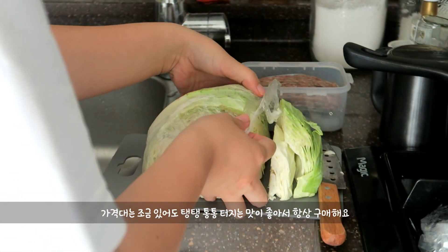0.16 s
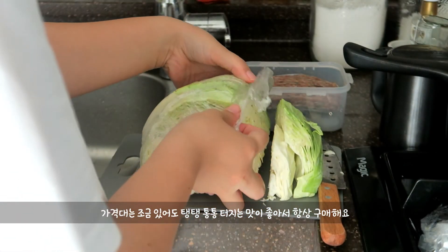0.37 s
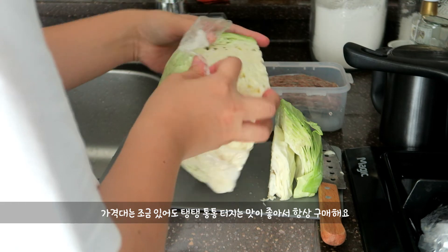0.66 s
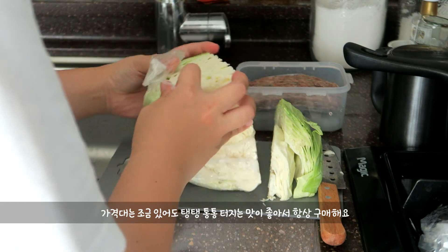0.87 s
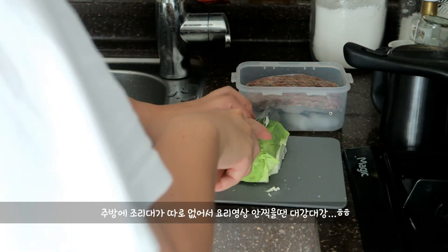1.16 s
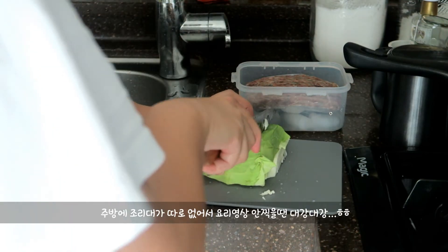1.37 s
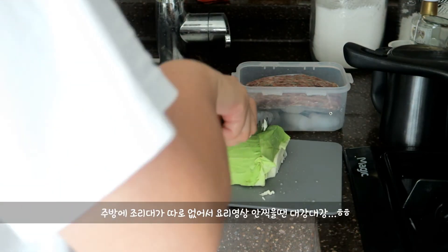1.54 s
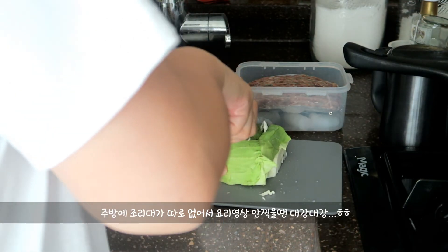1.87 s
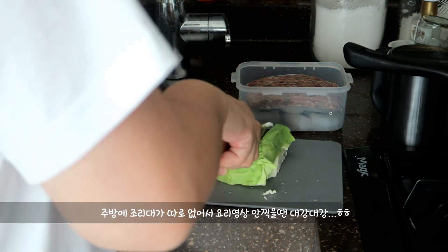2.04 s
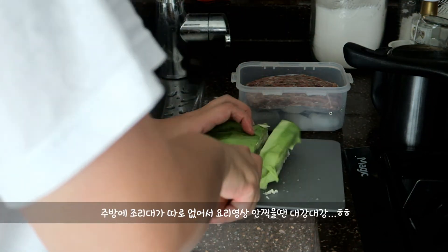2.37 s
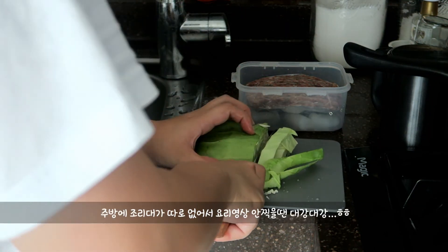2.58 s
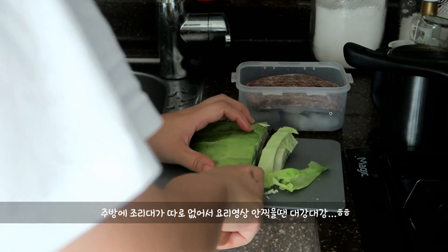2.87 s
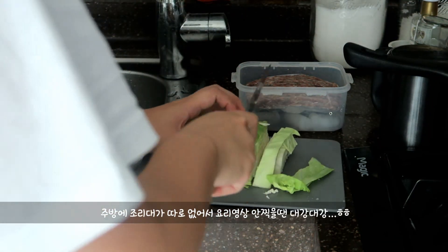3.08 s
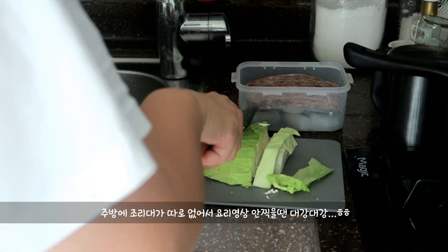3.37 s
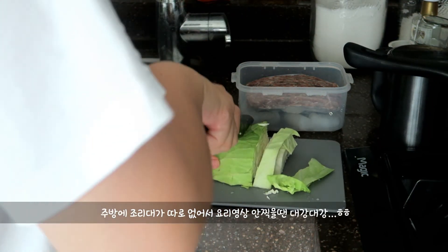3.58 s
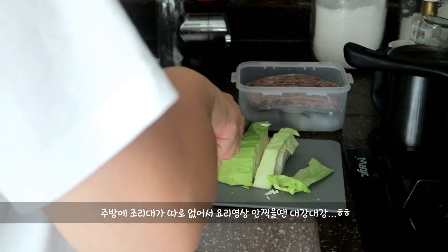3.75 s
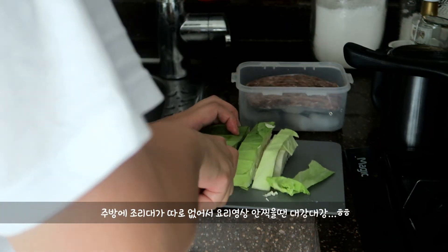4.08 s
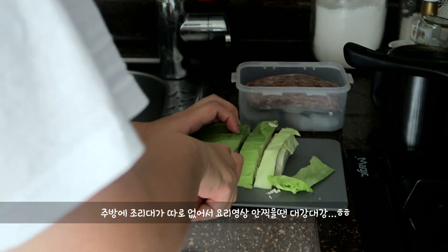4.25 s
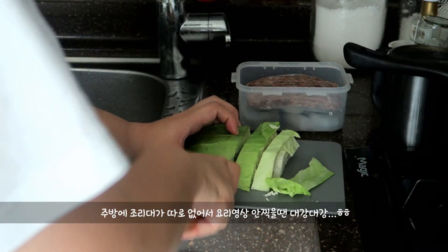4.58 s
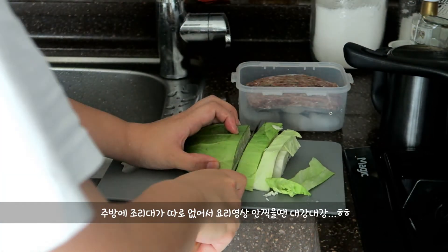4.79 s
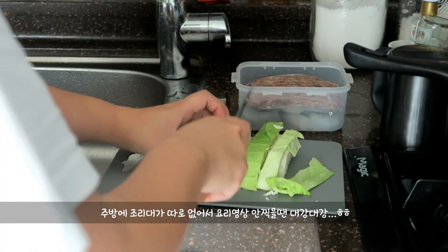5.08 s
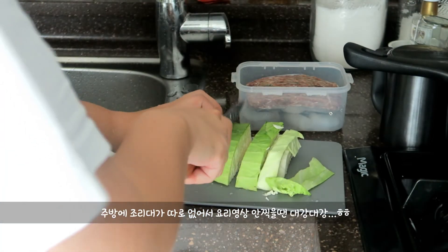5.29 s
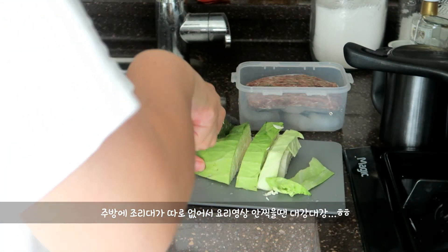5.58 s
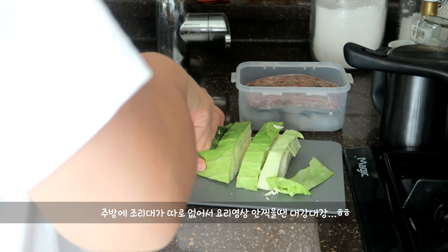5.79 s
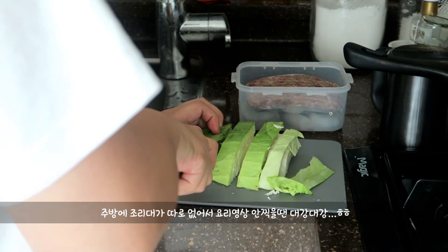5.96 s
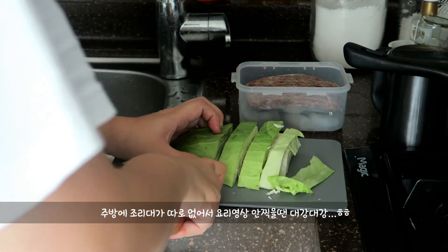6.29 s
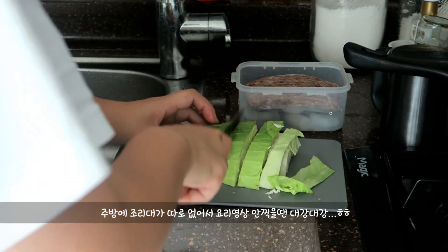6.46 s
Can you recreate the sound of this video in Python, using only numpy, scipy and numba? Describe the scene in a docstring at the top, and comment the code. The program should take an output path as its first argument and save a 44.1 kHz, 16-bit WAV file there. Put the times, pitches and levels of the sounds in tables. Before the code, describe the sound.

Close stereo pickup in a small tiled kitchen with a faint fridge hum. Cling film crinkles briefly, then a cabbage head lands with a deep, rocking thud. A knife presses through a wedge in three slow cuts, leaves crunching and snapping in uneven bursts, each ending in a sharp knock on a plastic board. The last cut knocks twice, with a short hollow ring.

```python
"""A fridge hums in a small tiled kitchen while cling film crinkles and rustles in swarms of tiny rings.
A cabbage is set down: worktop modes boom and filtered noise slaps. Then a knife is pushed through
a wedge three times: leaves crunch in bursts of dense short rings, the worktop shakes with low noise
and the blade knocks on a plastic board, heard as short modes and a crack of noise.
The level dips, most in the treble, after the loudest blows; a hollow ring follows the last knock."""
import sys
import numpy as np
from scipy import signal
from scipy.fft import rfft, irfft, next_fast_len
from scipy.io import wavfile
from scipy.ndimage import uniform_filter1d
from numba import njit

SR = 44100
rng = np.random.default_rng(int(sys.argv[2]) if len(sys.argv) > 2 else 0)


def decibels_to_gain(level_db):
    """Convert a level in decibels to a linear amplitude gain (20 dB per decade)."""
    exponent = np.asarray(level_db, float) / 20
    return 10 ** exponent


def file_out(sig):
    """Save sig as 16-bit WAV at sys.argv[1]."""
    # one column per channel
    cols = np.atleast_2d(sig).T
    # limit, then scale
    lim = np.clip(cols, -1, 1)
    pcm = np.round(lim * 32767).astype(np.int16)
    wavfile.write(sys.argv[1], SR, pcm)


N = 292383
TIME = np.arange(N) / SR
TICK = np.arange(0, N / SR + .002, .001)  # seconds, the coarse clock of the level curves

# Levels in these tables are relative within their layer unless said otherwise.
# Fridge hum partials: pitch_hz, level_db
HUM_PARTIALS = [(59.2, -60.5), (118.4, -65.5), (177.6, -65), (290, -64)]
# Spectral shape of the kitchen air: pitch_hz, level_db (per Hz)
AIR_SPECTRUM = [(15, -28.5), (25, -3.5), (59, -6), (109, -5.5), (231, 0.5), (298, 4), (451, -3.5),
                (797, -4), (979, -7.5), (1060, -12.5), (2180, -21), (3560, -25.5), (12000, -72),
                (15600, -97), (22000, -120)]
# Stereo width of air and reflections: pitch_hz, side_minus_mid_db
SIDE_WIDTH = [(60, -36.5), (110, -26.5), (200, -9.5), (380, -5), (700, -5), (1290, -1.5), (2380, 4),
              (4400, 4), (8120, 1), (15000, 7.5)]
# Reverberation bands: centre_hz, t60_s, level_db
ROOM_BANDS = [(90, .22, -8), (250, .33, -5), (600, .37, -3), (1400, .32, -5), (3200, .29, -7),
              (7000, .23, -7), (13000, .15, -9)]
# Phase between the microphone ports: pitch_hz, left_lead_rad
PORT_LEAD = [(0, 0), (1400, -1.1), (2800, -1.45), (5600, -1.75), (11000, -2.1), (16000, -2.2)]
# Dips of the whole level: start_s, middle_band_depth_db, sink_s, hold_s, return_time_constant_s
LEVEL_DIPS = [(.922, -22, .025, .093, .008), (2.58, -22, .12, .09, .16), (4.62, -8, .18, .012, .08),
              (6.36, -28, .15, .04, .14)]
# Film crinkles: start_s, level_db, centre_hz, spread_s
FILM_CRINKLES = [(.004, -40, 3000, 0.024), (0.125, -33.5, 3500, 0.005), (0.16, -34, 4040, 0.0066),
                 (.2, -28.5, 2992, 0.006), (0.216, -43, 2537, 0.011), (0.266, -47.5, 3038, 0.016),
                 (0.326, -40.5, 5050, 0.0067), (0.4, -40, 3387, 0.005), (0.482, -45, 3524, 0.0025),
                 (0.555, -41, 3900, 0.012), (0.592, -38, 3800, 0.0098), (0.66, -47.5, 4570, 0.006),
                 (0.779, -46.5, 3560, 0.0047), (0.796, -42, 2900, 0.005), (0.814, -43, 6070, .005)]
# Cabbage head landing and rocking: start_s, level_db, slap_db (relative to level_db)
CABBAGE_THUDS = [(.866, -18, -10), (.8765, -9, -15), (.893, -12, -24), (.909, -22, -6)]
# Ringing modes of the worktop: pitch_hz, level_db, t60_s
WORKTOP_MODES = [(57.2, -1.5, 0.09), (102.2, 6.5, 0.029), (154.6, -5, 0.043), (285, -12.5, 0.029),
                 (464, -19.5, 0.033), (854, -21, 0.037)]
# Blade meets board, with its bounces: start_s, level_db, crack_db (relative to level_db),
# crack_corner_hz, crack_t60_s
BLADE_KNOCKS = [(2.3978, 4, 11, 2000, 0.02), (2.4025, -5.5, 12, 1800, 0.034), (4.5323, 1, 4, 2300, 0.01),
                (4.538, -10, 16, 1500, 0.022), (5.9478, 0.5, 13, 3200, 0.012),
                (5.9525, -8, 16, 2630, 0.018), (6.1839, -1.5, 15, 2282, 0.012),
                (6.189, -5.5, 14, 1700, 0.028)]
# Ringing modes of the plastic board: pitch_hz, level_db, t60_s
BOARD_MODES = [(395, -6, .04), (505, -6, .04), (630, -5, .035), (720, -3, .035), (810, -4, .035),
               (1030, -3, .025), (1250, -2, .025), (1380, -2, .02), (1900, -1, .015), (2160, 0, .015),
               (2780, -3, .012), (3500, -6, .01)]
# Small snaps of single ribs: start_s, level_db, centre_hz, ring_cycles (to fall 60 dB)
RIB_SNAPS = [(1.593, -36.5, 3160, 4.3), (1.638, -45.5, 2050, 3.2), (1.757, -26, 4590, 5.4),
             (1.913, -16, 4870, 5.0), (2.021, -16, 360, 6.4), (3.279, -52.5, 287, 5.0),
             (3.561, -28, 3960, 8), (3.641, -28.5, 1104, 6.3), (3.92, -33, 293, 3.5),
             (4.218, -26.5, 2338, 7.7), (4.394, -18.5, 262, 6.6), (5.009, -28.5, 260, 6.8),
             (5.644, -11.5, 1900, 5.0), (5.886, -21, 2010, 5.0)]
# A wet leaf squeaks: start_s, end_s (full level between them), pitch_hz, rms_level_db
LEAF_SQUEAK = (5.105, 5.165, 1500, -57)
# Spectral shape of the crisp crackle: pitch_hz, level_db (per Hz)
CRISP_SPECTRUM = [(710, -31), (1200, -6.5), (1340, -15), (1420, -10), (1880, -5), (2050, -5), (4930, -9.5),
                  (11400, -20.5), (14400, -35), (15500, -31)]
# Spectral shape of the hollow ring: pitch_hz, level_db (per Hz)
HOLLOW_SPECTRUM = [(120, -36.5), (200, -24), (395, 1.5), (540, -5), (620, -6), (766, -5), (1130, -6),
                   (1430, -12), (1800, -16.5), (2340, -37), (3960, -120)]
# Spectral shape of the worktop shake: pitch_hz, level_db (per Hz)
SHAKE_SPECTRUM = [(25, -12), (45, 5.5), (70, -6.5), (115, 1.5), (160, 0.5), (220, -11.5), (400, -21.5),
                  (1000, -63.5)]
# Steady rustle, first under the film, later of hands or blade resting on the leaves:
# start_s, end_s, crisp_level_db, hollow_level_db, shake_level_db
STEADY_RUSTLES = [(0, .86, -70, -60, -59), (1.05, 1.56, -70, -57, -57), (1.58, 2.39, -57, -62, -52),
                  (2.93, 3.58, -76, -60, -60), (3.6, 4.5, -55, -62, -52), (4.72, 5.45, -90, -62, -56),
                  (5.47, 6.1, -55, -56, -56)]
# Bursts of rustle: first film and handling, later breaking leaf, at the end a hollow ring
# dying away after the last knock: peak_s, crisp_level_db, rise_s (by 20 dB), fall_s (by 20 dB),
# hollow_db (relative to crisp_level_db)
RUSTLE_BURSTS = [(0, -49, .01, .05, -4), (.128, -52, .008, .25, 1.5), (.202, -37, .014, .022, -7),
                 (.225, -54, .02, .22, 0), (.406, -45.5, .026, .017, -3), (.598, -51, .07, .02, -3),
                 (.802, -57, .05, .09, -11), (1.385, -69, .04, .2, 21), (1.43, -67, .1, .1, 22),
                 (1.546, -53, .06, .05, -9), (1.596, -42.5, .008, .05, -20), (1.642, -43, .008, .035, -8),
                 (1.762, -30, .016, .09, -4), (1.8, -34, .08, .07, -8), (1.885, -42, .1, .1, 1),
                 (1.922, -36, .02, .12, -4), (2.02, -30, .022, .1, -2), (2.045, -26, .05, .08, 3),
                 (2.1, -46, .05, .08, 14), (2.19, -45, .06, .06, -12), (2.27, -34, .05, .2, -9),
                 (2.31, -40, .05, .06, 9), (2.395, -20, .05, .005, 1.2), (2.965, -62, .06, .12, 11.5),
                 (3.038, -67, .05, .08, 12), (3.282, -50.5, .011, .03, -1), (3.46, -66, .08, .1, 5),
                 (3.51, -61, .04, .04, 1), (3.564, -44.5, .013, .03, -22), (3.61, -52, .04, .05, 8),
                 (3.652, -28, .016, .1, -6), (3.69, -25.5, .06, .06, -1.5), (3.81, -38, .1, .25, -1.5),
                 (3.9, -40, .05, .1, -2.5), (3.936, -27, .03, .08, -1.5), (3.962, -25, .035, .06, 13.5),
                 (4.04, -44, .05, .06, 14), (4.07, -35, .1, .08, -20), (4.12, -35, .08, .06, -20),
                 (4.234, -33, .045, .08, -25), (4.272, -28.5, .045, .05, 2.5), (4.415, -36, .05, .06, -2.5),
                 (4.526, -18.5, .018, .04, 2.5), (4.6, -45, .05, .06, 17), (4.65, -38, .1, .065, 4),
                 (4.73, -66, .05, .1, 20), (4.905, -59, .035, .2, -16), (4.976, -48, .08, .05, -4),
                 (5.16, -76, .06, .08, 26), (5.364, -52, .01, .03, 4), (5.475, -55, .025, .1, 1.5),
                 (5.505, -44, .05, .15, -12), (5.565, -41, .08, .08, -8), (5.65, -32, .009, .15, -2.5),
                 (5.69, -26, .07, .06, -.8), (5.725, -28, .05, .04, 5), (5.802, -32.5, .036, .08, -20),
                 (5.892, -26, .012, .03, -25), (5.945, -18, .06, .02, -8), (5.97, -33, .02, .035, 17),
                 (6.125, -41.5, .06, .2, -19), (6.184, -19, .014, .025, -8), (6.21, -38, .012, .04, 13),
                 (6.235, -56, .05, .07, 29), (6.42, -60, .15, .12, 9)]
# Weight shoved onto the worktop through knife or hand: peak_s, level_db, fall_s (by 20 dB)
WORKTOP_SHOVES = [(1.8, -41, .12), (1.94, -44, .08), (2.035, -30, .07), (2.1, -34, .1), (2.31, -39, .1),
                  (2.38, -34, .1), (3.3, -49, .13), (3.69, -39, .25), (3.82, -44, .1), (3.935, -28, .12),
                  (4.02, -37, .1), (4.09, -40, .15), (4.265, -31, .12), (4.42, -43, .12), (4.58, -46, .15),
                  (4.65, -43, .1), (4.715, -38, .1), (5.37, -41, .25), (5.66, -34, .15), (5.715, -29, .12),
                  (5.82, -39, .12), (5.93, -32, .12), (6.21, -42, .08)]
# Brightness of the crackle before loudness alters it: time_s, tilt_db_per_octave
CRISP_TILT = [(0, -1), (.7, .6), (1.5, -2.5), (1.6, 6), (2.0, 5), (2.38, 3.5), (2.95, -4), (3.3, -.6),
              (3.58, -1.5), (3.66, 4), (3.86, -.8), (3.94, 2.5), (4.02, -.4), (4.13, 2.5), (4.22, -.8),
              (4.4, -.8), (4.53, 1.2), (4.6, -3), (4.75, -5), (4.93, 3), (5.08, -4), (5.46, -5),
              (5.56, 3.5), (5.66, 3.5), (5.75, .4), (5.9, -1.8), (6.15, 3.5), (6.19, -7)]
# Brightness of the hollow ring: time_s, tilt_db_per_octave
HOLLOW_TILT = [(0, -2.5), (1.5, -2.5), (1.9, 3), (2.1, -4), (2.32, -4), (2.4, 1.5), (3.0, -3), (3.5, .3),
               (3.65, 5), (3.8, 1.5), (3.94, 1.5), (4.0, -4), (4.35, -5), (4.5, 1.5), (5.6, .3), (5.72, 3),
               (5.97, -1.5), (6.2, 2.5), (6.4, 3)]


def on_log(hz, table):
    """A table of pitch and value read on a log pitch axis."""
    table_hz, value = np.transpose(table)
    return np.interp(np.log(np.maximum(hz, 1)), np.log(np.maximum(table_hz, 1)), value)


def shaped(x, gain):
    """x weighted by gain(hz)."""
    n = next_fast_len(x.shape[-1])
    hz = np.arange(n // 2 + 1) * SR / n
    return irfft(rfft(x, n) * gain(hz), n)[..., :x.shape[-1]]


@njit
def add(out, start, hz, t60, size):
    """Add decaying sines that swell in over their first cycle."""
    for k in range(len(start)):
        turn = np.exp(2j * np.pi * hz[k] / SR - np.log(1000) / (t60[k] * SR))
        z, onset, rise = size[k] + 0j, 1., np.exp(-2 * hz[k] / SR)
        for i in range(int(start[k] * SR), min(len(out), int((start[k] + t60[k]) * SR))):
            z *= turn
            onset *= rise
            out[i] += z.imag * (1 - onset)


def grains(start, hz, cycles, db):
    """Short rings, scaled so that energy follows db whatever the pitch."""
    out, t60 = np.zeros(N), cycles / hz
    add(out, start, hz, t60, decibels_to_gain(db) * np.sqrt(4 * np.log(1000) / (t60 * SR)))
    return out


def struck(s, db, modes, scatter_db):
    """One blow: every mode rings with a new strength and a slightly new pitch."""
    hz, mode_db, t60 = np.transpose(modes)
    chance = rng.standard_normal((2, len(hz)))
    out = np.zeros(N)
    pitch = hz * (1 + .015 * chance[0])
    add(out, s + 0 * hz, pitch, t60, decibels_to_gain(db + mode_db + scatter_db * chance[1]))
    return out


def burst(s, t60):
    """Noise that starts at s and dies away exponentially."""
    decay = np.exp(-np.log(1000) * np.abs(TIME - s) / t60)
    return rng.standard_normal(N) * (TIME >= s) * decay


def swell(s, db, rise, fall):
    """Summed power of events that grow and fade evenly in dB around their peaks."""
    late = TICK - s[:, None]
    below_peak = np.where(late < 0, -late / rise[:, None], late / fall[:, None])
    return (decibels_to_gain(db[:, None] - 20 * below_peak) ** 2).sum(0)


def wide(mid, side):
    """Left and right from unrelated mid and side; the side is weak in the bass."""
    side = shaped(side, lambda hz: decibels_to_gain(on_log(hz, SIDE_WIDTH)))
    return np.array([mid + side, mid - side])


def kitchen():
    """Fridge hum of sines wavering in level and phase, over a dull rush of air."""
    air_db = -56  # rms of the mid
    mid, side = shaped(rng.standard_normal((2, N)), lambda hz: decibels_to_gain(on_log(hz, AIR_SPECTRUM)))
    waver = uniform_filter1d(rng.standard_normal((len(HUM_PARTIALS), N)), size=4000) * np.sqrt(4000)
    hum = 0
    for (hz, db), drift in zip(HUM_PARTIALS, waver):
        hum = hum + decibels_to_gain(db + 0.5 + 4.5 * drift) * np.sin(2 * np.pi * hz * TIME + 0.17 * drift)
    return wide(mid, side) * decibels_to_gain(air_db) / mid.std() + hum


def room(x):
    """Dense reflections off tiles and steel; each band dies at its own rate."""
    t = TIME[:SR // 2]
    noise, tail = rng.standard_normal((2, len(t))), 0
    for k, (_, t60, db) in enumerate(ROOM_BANDS):
        # neighbouring bands crossfade on the log pitch axis
        share = [(band[0], float(j == k)) for j, band in enumerate(ROOM_BANDS)]
        band_noise = shaped(noise, lambda hz: on_log(hz, share))
        decay = np.exp(-np.log(1000) * t / t60) * (1 - np.exp(-t / .002))
        even_energy = np.sqrt(2 * np.log(1000) / (t60 * SR))
        tail = tail + decibels_to_gain(db) * band_noise * decay * even_energy
    return wide(*signal.fftconvolve(x[None], tail, axes=1)[:, :N])


def port(x, side):
    """One microphone port: bass nearly alike on both, higher pitches shifted in phase and level."""
    left_minus_right_db = -1.5  # approached towards the treble
    lead_hz, lead_rad = np.transpose(PORT_LEAD)

    def response(hz):
        level = decibels_to_gain(side * left_minus_right_db / 2 * hz / (hz + 250))
        return level * np.exp(.5j * side * np.interp(hz, lead_hz, lead_rad))
    return shaped(x, response)


def dips():
    """Gain curve: the level sinks, stays down and creeps back."""
    total_db = 0
    for s, db, sink, hold, back in LEVEL_DIPS:
        down = np.clip((TIME - s) / sink, 0, 1)
        total_db = total_db + db * down * np.exp(-np.maximum(TIME - s - sink - hold, 0) / back)
    return decibels_to_gain(total_db)


def dipped(heard):
    """The dips go deeper in the treble and stay shallower in the bass."""
    treble = shaped(heard, lambda hz: 1 - 1 / (1 + (hz / 3500) ** 4))
    bass = shaped(heard, lambda hz: 1 / (1 + (hz / 250) ** 4))
    gain = dips()
    # an exponent on the gain multiplies the depth in dB
    return (heard - treble - bass) * gain + treble * gain ** 1.8 + bass * gain ** .8


def film():
    """Each crinkle is a swarm of tiny folds snapping, densest at its start."""
    s, db, hz, spread = np.transpose(FILM_CRINKLES)[:, :, None]
    chance = rng.standard_normal((len(FILM_CRINKLES), 3, 80)).transpose(1, 0, 2)
    start = s + spread * np.abs(chance[0])
    pitch = np.clip(hz * np.exp(.38 * chance[1]), 600, SR / 3)
    level_db = db + 4 + 3.0 * chance[2]
    return grains(start.ravel(), pitch.ravel(), 5.7, level_db.ravel())


def thuds():
    """The heavy head shakes the worktop into ringing; its wrapped skin slaps as dull noise."""
    slap = sum(decibels_to_gain(db + slap_db) * burst(s, .04) for s, db, slap_db in CABBAGE_THUDS)
    boom = sum(struck(s, db, WORKTOP_MODES, 1) for s, db, _ in CABBAGE_THUDS)
    return boom + shaped(slap, lambda hz: 5.3 / (1 + (hz / 900) ** 1.4))


def squeak():
    """A wet leaf squeaks: a narrow band of noise fades in and out."""
    start, end, squeak_hz, squeak_db = LEAF_SQUEAK
    fade = np.interp(TIME, [start - .015, start, end, end + .015], [0, 1, 1, 0])
    tone = shaped(rng.standard_normal(N), lambda hz: np.exp(-((hz - squeak_hz) / 70) ** 2))
    return decibels_to_gain(squeak_db) * fade * tone / tone.std()


def snaps():
    """Single ribs breaking, each a few quick rings of scattered pitch."""
    s, db, hz, cycles = np.transpose(RIB_SNAPS)[:, :, None]
    chance = rng.standard_normal((len(RIB_SNAPS), 2, 12)).transpose(1, 0, 2)
    start = s + 0.0023 * np.abs(chance[0])
    pitch = np.minimum(hz * np.exp(0.2 * chance[1]), SR / 3)
    every = 0 * pitch  # spreads one value over all rings of a snap
    return grains(start.ravel(), pitch.ravel(), (cycles + every).ravel(), (db + 1.5 + every).ravel())


def knocks():
    """Short board modes plus a broad crack of noise; the light board gives off little bass."""
    out = 0
    for s, db, crack_db, corner_hz, crack_t60 in BLADE_KNOCKS:
        crack = shaped(burst(s, crack_t60),
                       lambda hz: (hz / corner_hz) ** 1.2 / (1 + (hz / corner_hz) ** 3.37))
        out = out + struck(s, db - 12, BOARD_MODES, 3.0) + decibels_to_gain(db + crack_db) * crack
    return signal.sosfilt(signal.butter(3, 260, "high", fs=SR, output="sos"), out)


def crackle(level_db, tilt_db, spectrum, count, cycles, pivot_hz):
    """Dense short rings: random moments, pitches and sizes under a level curve."""
    moment, height, luck = rng.random((count, 3)).T
    low, high = spectrum[0][0], spectrum[-1][0]
    hz, start = low * (high / low) ** height, moment * N / SR
    size_db = -2.8 * np.log(1.001 - luck)  # many small, few large
    # the crackle clumps, as from a blade that sticks and slips:
    # one draw for all pitches, one for each half of the pitch range
    slip_db = 2.6
    slips = rng.standard_normal((3, 1000))
    slot = (moment * 1000).astype(int)
    clump_db = slip_db * (.8 * slips[0, slot] + .6 * slips[1 + (height > .5), slot])
    # pitches are drawn evenly per octave, so 10 log10(hz) turns level per Hz into level per grain
    db = on_log(hz, spectrum) + 10 * np.log10(hz) + size_db + clump_db
    db = db - 10 * np.log10(np.sum(decibels_to_gain(db) ** 2) / N)
    octave_db = np.interp(start, TIME, tilt_db) * np.log2(hz / pivot_hz)
    ring = cycles * (1 + size_db / 6)  # big grains ring longer
    return grains(start, hz, ring, db + octave_db + np.interp(start, TIME, level_db))


def rustle_levels():
    """Level curves of crisp crackle, hollow ring and shake, summed as power from all events."""
    start, end, *rustle_db = np.transpose(STEADY_RUSTLES)
    active = (TICK >= start[:, None]) & (TICK < end[:, None])
    steady = uniform_filter1d(1. * active, size=30)
    crisp, hollow, shake = (decibels_to_gain(db) ** 2 @ steady for db in rustle_db)
    s, db, rise, fall, hollow_db = np.transpose(RUSTLE_BURSTS)
    crisp = crisp + swell(s, db, rise, fall)
    hollow = hollow + swell(s, db + hollow_db, rise, fall)
    s, db, fall = np.transpose(WORKTOP_SHOVES)
    shake = shake + swell(s, db, .035 + 0 * s, fall)  # 35 ms to rise 20 dB
    return [np.interp(TIME, TICK, 10 * np.log10(p + 1e-14)) for p in (crisp, hollow, shake)]


def rustle_and_crunch():
    """Film rustle, then breaking leaf: crisp crackle, hollow ring and a low shake of the worktop."""
    crisp_db, hollow_db, shake_db = rustle_levels()
    # harder bursts are brighter, softer ones duller
    crisp_tilt = np.interp(TIME, *np.transpose(CRISP_TILT)) + .08 * (crisp_db + 40)
    hollow_tilt = np.interp(TIME, *np.transpose(HOLLOW_TILT))
    shake = shaped(rng.standard_normal(N), lambda hz: decibels_to_gain(on_log(hz, SHAKE_SPECTRUM)))
    crisp = crackle(crisp_db + 5.5, crisp_tilt, CRISP_SPECTRUM, count=100000, cycles=4.34, pivot_hz=4000)
    hollow = crackle(hollow_db - 2.5, hollow_tilt, HOLLOW_SPECTRUM, count=20000, cycles=6.46, pivot_hz=600)
    return crisp + hollow + shake / shake.std() * decibels_to_gain(shake_db - 3.0)


def scene():
    """All close sounds reach the two ports directly, then again from the room, over the kitchen."""
    film_room_db = -5  # the film is held up, away from the ringing worktop
    crinkles = film()
    worktop = rustle_and_crunch() + thuds() + knocks() + snaps() + squeak()
    direct = np.array([port(worktop + crinkles, side) for side in (1, -1)])  # left, right
    reflected = room(worktop + decibels_to_gain(film_room_db) * crinkles)
    return dipped(direct + reflected + kitchen())


def roll_off(x):
    """The treble ends steeply here."""
    return signal.sosfilt(signal.butter(12, 15640, fs=SR, output="sos"), x)


def record(dry):
    """The microphone drops the deepest bass; peaks are clipped at full scale."""
    cut = signal.sosfilt(signal.butter(3, 36, "high", fs=SR, output="sos"), dry)
    mix = np.clip(cut, -1, 1)
    return roll_off(mix)


dry = scene()
out = record(dry)
file_out(out)
```